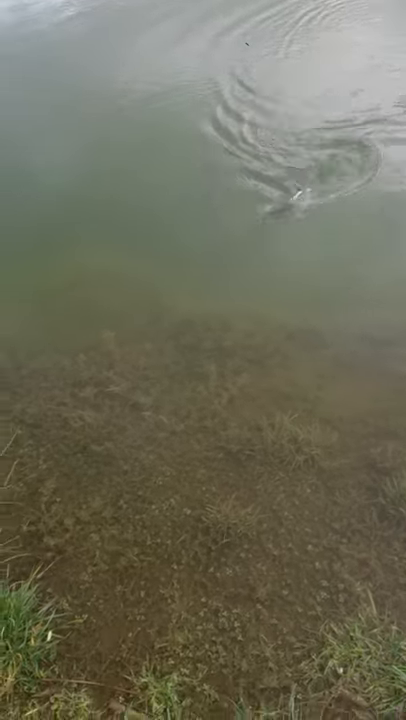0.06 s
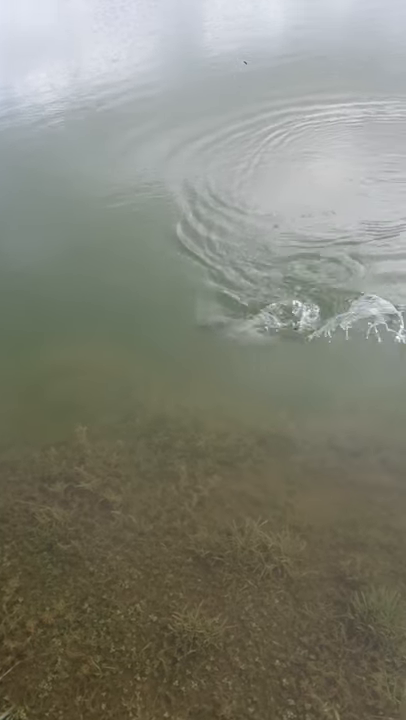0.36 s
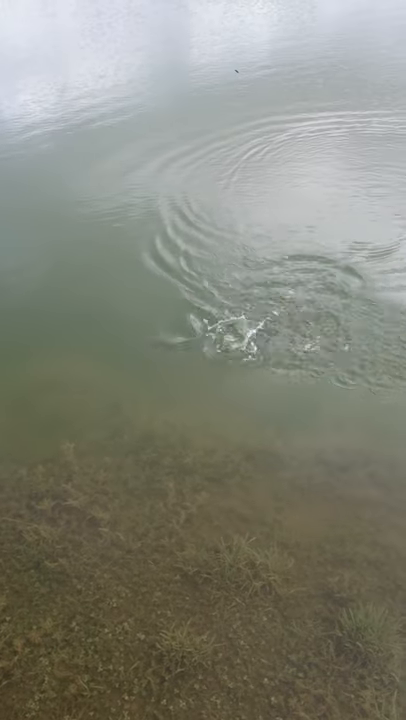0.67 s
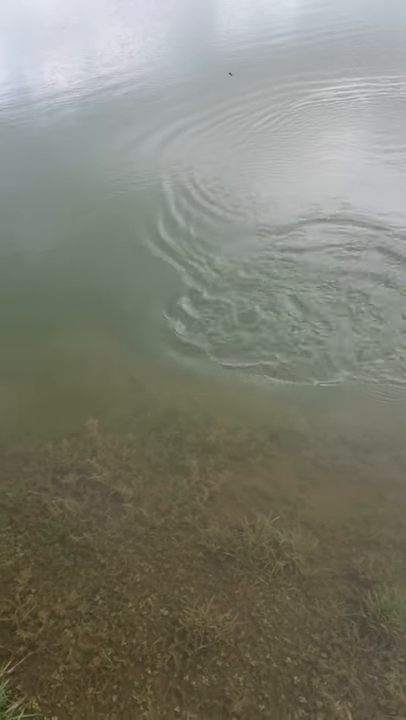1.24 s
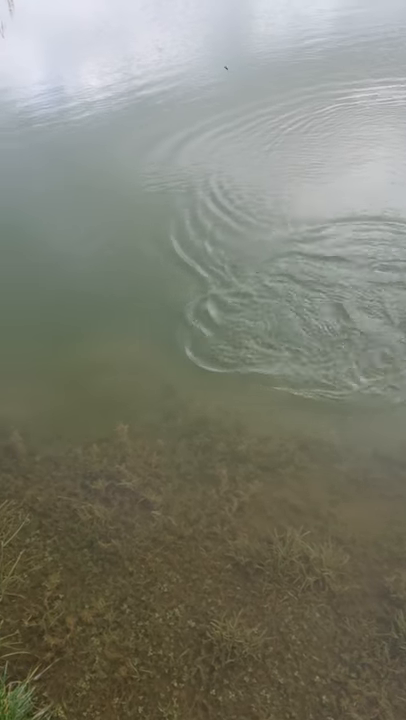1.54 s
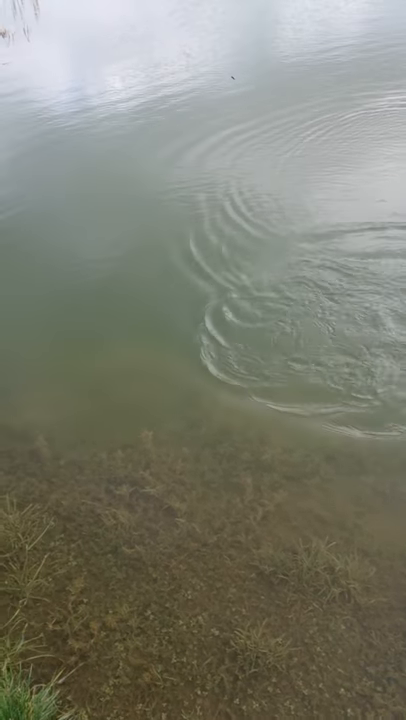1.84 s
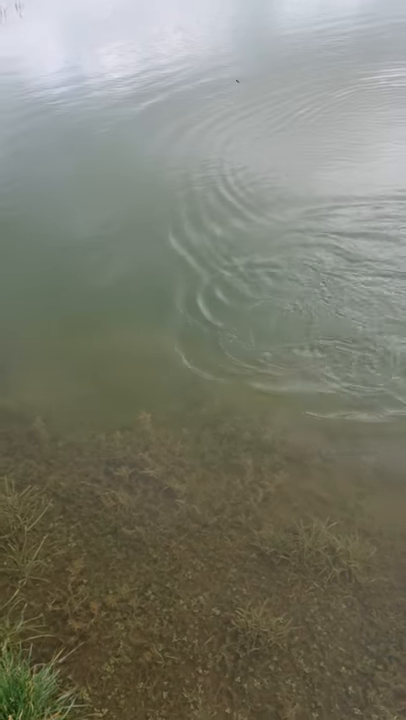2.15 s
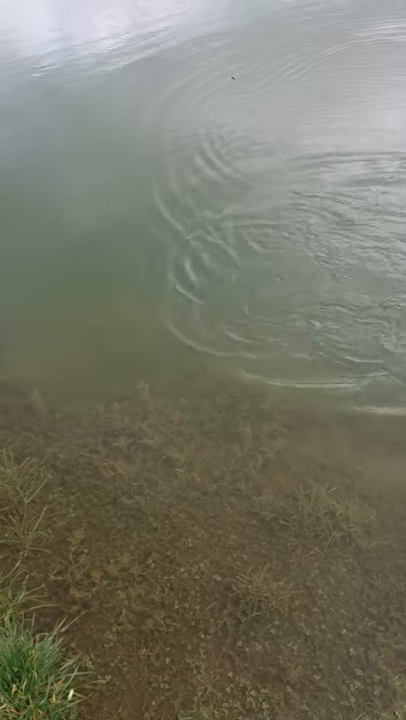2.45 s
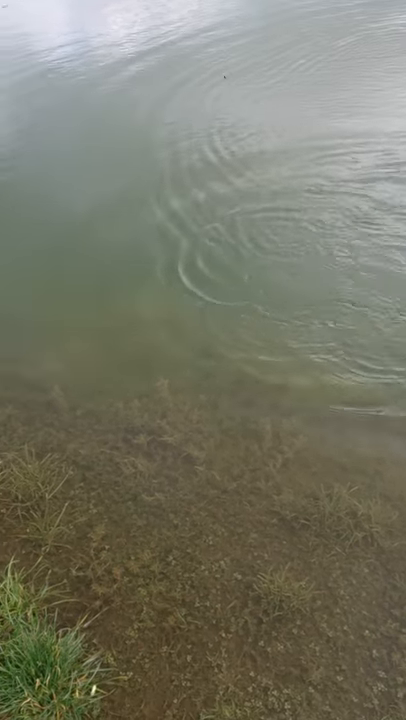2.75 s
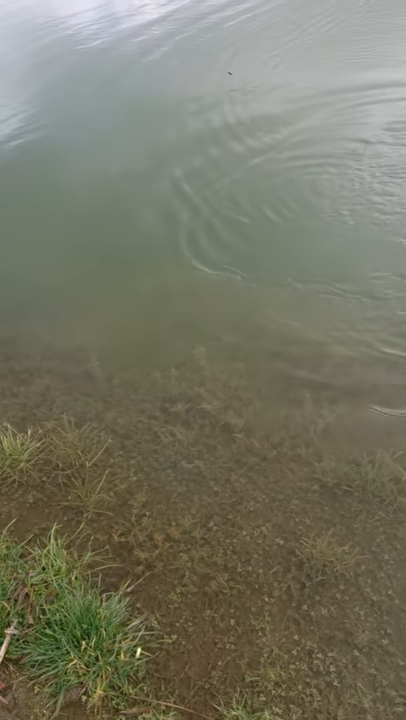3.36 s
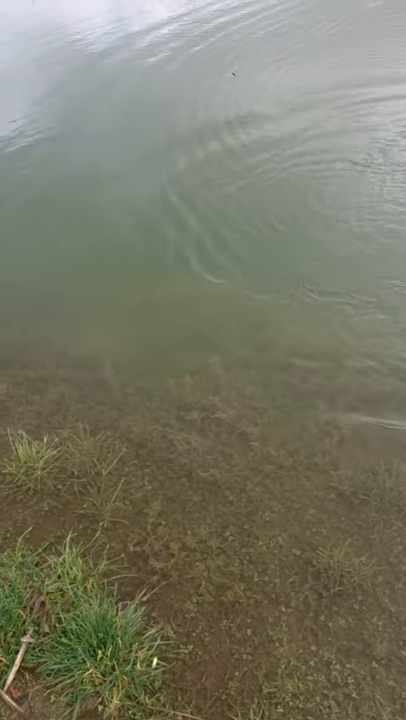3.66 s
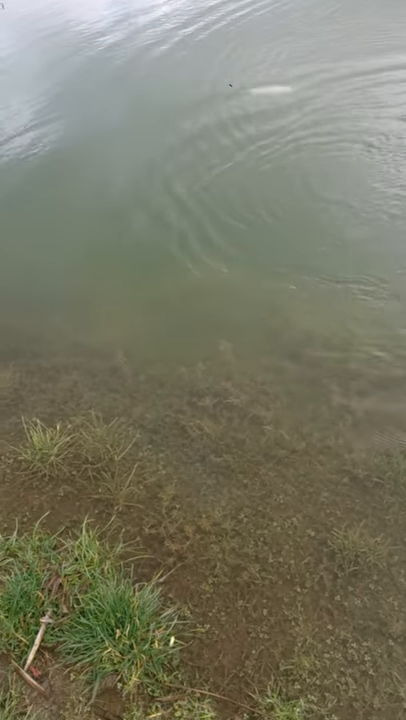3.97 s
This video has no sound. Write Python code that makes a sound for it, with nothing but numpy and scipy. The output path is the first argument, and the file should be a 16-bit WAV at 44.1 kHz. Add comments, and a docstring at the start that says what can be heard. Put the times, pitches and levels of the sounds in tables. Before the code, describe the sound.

A fish splashes briefly at a pond's surface while wind rumbles on the microphone.

```python
"""Fish thrashing in a pond

A few metres away a fish slaps the surface with its tail, air pockets ring as rising bubbles,
and spray patters back. Wind buffets the two microphone ports separately with rumble, eddies
and dull vortex knocks. Small birds call over a distant roar."""
import sys
import numpy as np
from scipy import signal
from scipy.fft import rfft, irfft
from scipy.io import wavfile

SR = 44100
rng = np.random.default_rng(int(sys.argv[2]) if len(sys.argv) > 2 else 0)


def persist_wave(psi):
    """Save psi, clipped to +-1, as 16-bit WAV."""
    counts = np.round(np.clip(psi, -1, 1) * 32767).astype(np.int16)
    wavfile.write(sys.argv[1], SR, np.atleast_2d(counts).T)


N = 176400

# spectrum of bubbling water (frequency [Hz], gain [dB])
CHURN_EQ = [(200, 9), (450, -5.5), (800, -0.5), (1250, 4), (1800, 4), (2500, 1.5), (3100, -1), (3800, -18),
            (4500, -18), (7000, -16), (16000, -51)]


def fish():
    """The whole splash, shaded at the right port, with short and long reflections."""
    left, right = at_ports(tail_slaps() + air_pockets()) + churn() + spray() + trickle()
    # shading of the right port (frequency [Hz], gain [dB])
    shade = [(200, 13), (1000, 1), (1800, 4.5), (2600, -4.5), (3200, -5), (3900, -6), (4500, -3),
             (5600, -4), (6600, -26), (7700, 1), (9000, -20), (11000, -10.5), (14500, -3)]
    near_bank = scatter(np.array([left, colour(right, shade)]), t60_s=0.027, wet_db=-9)
    return scatter(near_bank, t60_s=0.55, wet_db=-19)


def tail_slaps(decay_cycles=2.5, min_decay_s=0.0001, width_oct=0.73, size=1024):
    """Tail and big drops smack the water: broad bursts, the low ones dying more slowly."""
    # impacts (time [s], peak [dB], band centre [Hz])
    impacts = [(0.207, -54, 1820), (0.231, -53, 1170), (0.2425, -40, 3130), (0.301, -45, 6500),
               (0.326, -48, 2180), (0.337, -43, 4330), (.3645, -50, 3200), (.377, -45, 1700),
               (.43, -35.5, 1390), (.415, -37, 1750), (.4255, -30, 8200), (0.4353, -38, 9700),
               (0.4508, -32.5, 7000), (0.4565, -31.5, 6900), (.482, -40, 5900), (0.487, -34.5, 4330),
               (.577, -45, 9000), (0.6066, -34, 8100), (0.6303, -20.5, 5040), (0.6306, -20.5, 2800),
               (0.63, -37, 1340), (0.643, -35, 1520), (0.676, -35, 6400), (0.744, -36, 4500),
               (0.798, -39.5, 6300), (.841, -41.5, 7040), (0.879, -46, 9000), (0.895, -45, 6800),
               (.9225, -45, 8100), (1, -47, 8000), (1.045, -50.5, 5340), (1.37, -53, 8500),
               (1.941, -53.5, 8600)]
    out = np.zeros(N)
    t = np.arange(size) / SR
    for time_s, peak_db, hz in impacts:
        life_s = min_decay_s + decay_cycles / hz
        octaves = np.log2((np.fft.rfftfreq(size, 1 / SR) + 1) / hz)
        phase_rad = 2 * np.pi * rng.random(len(octaves))
        noise = irfft(np.exp(1j * phase_rad - (octaves / width_oct) ** 2))
        burst = noise * t / life_s * np.exp(-t / life_s)
        add(out, time_s, amp(peak_db) * burst / abs(burst).max())
    return out


def air_pockets():
    """Trapped air rings as single rising bubbles."""
    # pockets (time [s], gain [dB], start pitch [Hz], life [s])
    pockets = [(0.073, -48, 1123, 0.016), (0.228, -51, 1006, 0.013), (0.239, -24, 2350, 0.004),
               (0.268, -34, 856, 0.023), (0.323, -37, 1480, 0.01), (0.359, -41, 640, 0.017),
               (.367, -39.5, 783, 0.016), (0.375, -34, 1666, 0.0087), (0.415, -33, 1160, 0.0096),
               (0.431, -47, 1270, 0.015), (0.44, -36, 1697, 0.02), (.520, -36.5, 780, 0.0079),
               (0.522, -32, 1170, 0.0062), (0.63, -35, 1670, 0.0057), (0.642, -30.5, 1100, 0.0077),
               (0.645, -34.5, 1705, 0.013), (0.665, -59.5, 404, 0.039), (0.728, -47, 1000, 0.015),
               (0.755, -54, 406, 0.023), (0.82, -37.5, 1846, 0.02), (0.822, -59, 341, 0.066),
               (0.923, -53, 1230, 0.018), (0.959, -51, 2350, 0.014), (.975, -46.5, 1810, 0.01)]
    out = np.zeros(N)
    for time_s, gain_db, hz, life_s in pockets:
        add(out, time_s, amp(gain_db) * bubble(hz, life_s, rise=0.25, onset_s=0.0035))
    return out


def bubble(hz, life_s, rise, onset_s, wobble=0.05, wobble_s=0.002):
    """A ringing air pocket whose pitch wobbles and climbs as it nears the surface."""
    t = np.arange(0, 3 * life_s, 1 / SR)
    age = t / life_s
    jostle = wobble * np.interp(t / wobble_s, np.arange(80), rng.standard_normal(80))
    turns = np.cumsum(hz * (1 + jostle + rise * np.minimum(age, 2))) / SR
    attack = 1 - np.exp(-(t / onset_s) ** 2)
    return np.sin(2 * np.pi * turns) * attack * np.exp(-age - age ** 2)


def churn():
    """Churned water: a dense cloud of bubbles."""
    # envelope (time [s], level [dB])
    envelope = [(.19, -100), (.235, -48), (.30, -63.5), (.36, -46), (.395, -63), (.43, -44.5), (.47, -63),
                (.54, -49.5), (.61, -77), (.642, -48), (.67, -64), (.84, -67), (1.08, -87), (1.3, -84)]
    cloud = shower(per_s=2600, band_hz=(384.6, 5980), cycles=7.2,
                   spread_db=6.5, rise=0.19, onset_cycles=0.7)
    return level(envelope) * unit(colour(cloud, CHURN_EQ))


def spray():
    """Falling spray: drops patter back as tiny, high bubbles."""
    # envelope (time [s], level [dB])
    envelope = [(.19, -77.5), (.25, -60), (.31, -77.5), (.37, -54), (.40, -56.5), (.44, -49), (.472, -54.5),
                (.49, -46), (.53, -51.5), (.60, -55), (.72, -58.5), (.87, -61.5), (1.02, -68.5),
                (1.1, -72.5), (1.6, -78.5), (2.1, -106)]
    # spectrum (frequency [Hz], gain [dB])
    eq = [(500, -40), (2000, -8), (3100, 1), (3900, 0.5), (5000, 1.5), (7000, -1), (8700, 6), (11000, -3),
          (12600, -16), (14500, -8), (16000, -23)]
    drops = shower(per_s=3500, band_hz=(2100, 14700), cycles=4.8,
                   spread_db=2.5, rise=0.016, onset_cycles=0.99)
    return level(envelope) * unit(colour(drops, eq))


def trickle():
    """Small bubbles trickle up as the water settles."""
    # envelope (time [s], level [dB])
    envelope = [(.3, -80), (.42, -56), (.72, -61), (.85, -65), (1, -85), (1.2, -101)]
    bubbles = shower(per_s=260, band_hz=(600, 5500), cycles=11, spread_db=4, rise=0.1, onset_cycles=1)
    return level(envelope) * unit(colour(bubbles, CHURN_EQ))


def shower(per_s, band_hz, cycles, spread_db, rise, onset_cycles, sizes=44, clump_s=0.014, clump_db=3.5):
    """Tiny bubbles of many sizes at random times, swelling as the water falls in clumps."""
    out = np.zeros((2, N))
    clump_index = np.arange(N) / SR / clump_s
    for group_hz in np.array_split(np.geomspace(*band_hz, sizes), 4):
        clumps = amp(clump_db * np.interp(clump_index, np.arange(2048), rng.standard_normal(2048)))
        for hz in group_hz:
            births = rng.random(N) < per_s / sizes / SR
            hits = births * clumps * amp(spread_db * np.minimum(rng.exponential(1, N), 3))
            grain = np.pad(bubble(hz, cycles / hz, rise, onset_cycles / hz), 32)
            offset_s = 0.00005 * rng.standard_normal()  # drops land all around the fish
            out += signal.oaconvolve(hits[None], at_ports(grain * hz, offset_s), axes=1)[:, :N]
    return out


def wind_rumble():
    """Wind pressure swells and sinks separately on each port."""
    # gusts on the left port (time [s], level [dB])
    left = [(0, -35), (.22, -35), (.72, -40), (1.02, -29), (1.3, -32), (1.56, -53), (1.95, -34),
            (2.38, -30), (2.55, -39), (2.97, -26), (3.3, -38.5), (3.55, -28.5), (3.75, -31.5), (4, -36)]
    # gusts on the right port (time [s], level [dB])
    right = [(0, -31), (.17, -31.5), (.37, -42), (.78, -46.5), (1.05, -31.5), (1.24, -21.5), (1.33, -32.5),
             (1.43, -43.5), (1.72, -33.5), (2.022, -22.5), (2.18, -36), (2.5, -29.5), (2.86, -19.5),
             (3.08, -27), (3.219, -19.5), (3.46, -26), (3.609, -16), (3.78, -31), (4, -36.5)]
    # spectrum (frequency [Hz], gain [dB])
    eq = [(5, 7), (20, -1.5), (45, -5), (90, -16.5), (160, -26), (300, -40), (600, -60.5), (2000, -104)]
    return np.array([level(gusts) * unit(colour(rng.standard_normal(N), eq)) for gusts in (left, right)])


def wind_eddies(oct_per_db=0.12, typical_db=-34, right_scale=0.69, size=16384):
    """Eddies flutter over a port; stronger ones reach higher, those on the right sound lower."""
    # eddies (centre time [s], length [s], level [dB], port [0 left, 1 right])
    eddies = [(.051, 0.033, -35.5, 0), (0.161, 0.13, -38, 0), (.37, 0.054, -36.5, 0), (.52, 0.12, -42, 0),
              (0.699, 0.0044, -35.5, 0), (.903, 0.022, -34.5, 0), (1.04, 0.083, -35.5, 0),
              (1.18, 0.031, -39.5, 0), (1.242, 0.052, -36, 1), (2.017, 0.017, -35, 1),
              (2.041, 0.088, -39, 0), (2.31, 0.035, -33, 0), (2.4, 0.052, -34.5, 0),
              (2.505, 0.042, -34.5, 0), (2.53, 0.17, -37.5, 1), (2.679, 0.046, -32.5, 1),
              (2.85, 0.066, -32.5, 1), (3.0, 0.048, -33.5, 0), (3.1, 0.089, -36.5, 0),
              (3.219, 0.029, -31.5, 1), (3.391, 0.017, -32, 1), (3.53, 0.027, -30, 0),
              (3.609, 0.037, -29, 1), (3.629, 0.069, -36.5, 0), (3.67, 0.035, -29, 1),
              (3.869, 0.13, -33.5, 1)]
    # spectrum before pitch scaling (frequency [Hz], gain [dB])
    eq = [(10, -45), (50, -10), (110, 4.5), (200, -6.5), (310, -13.5), (450, -24.5), (800, -42),
          (2000, -82), (6000, -76)]
    out = np.zeros((2, N))
    t = (np.arange(size) - size / 2) / SR
    for time_s, length_s, level_db, port in eddies:
        swell = np.exp(-2.2 * (t / length_s) ** 2)
        pitch_scale = 2 ** (oct_per_db * (level_db - typical_db)) * (right_scale if port else 1)
        eddy = swell * colour(rng.standard_normal(size), eq, pitch_scale)
        gain = amp(level_db) * np.linalg.norm(swell) / np.linalg.norm(eddy)
        add(out[port], time_s + t[0], gain * eddy)
    return out


def vortex_knocks(steepness=1.593, size=4096):
    """A vortex crossing a port: one brief dip in pressure, heard as a dull knock."""
    # vortices (time [s], peak [dB], roll-off [Hz], port [0 left, 1 right])
    vortices = [(0.209, -21, 173, 0), (0.991, -23.5, 153, 0), (1.009, -25, 170, 0), (1.051, -24, 244, 0),
                (1.1, -27.5, 162, 0), (1.174, -25, 197, 0), (1.193, -25.5, 173, 1), (1.855, -16.5, 102, 1),
                (2.025, -22.5, 60.3, 1), (2.08, -25, 159, 0), (2.288, -23.5, 173, 0),
                (2.301, -26.5, 214, 0), (2.381, -24, 172, 0), (2.424, -26, 213, 0), (2.5, -27.5, 186, 0),
                (2.674, -21, 215, 0), (2.694, -19.5, 176, 0), (2.774, -24.5, 126, 1),
                (2.829, -23.5, 127, 1), (2.859, -28, 192, 1), (2.98, -22, 152, 0), (3.093, -27.5, 140, 1),
                (3.211, -25.5, 184, 1), (3.378, -19, 135, 1), (3.52, -15, 232, 0), (3.603, -17.5, 128, 1),
                (3.676, -28, 220, 1), (3.853, -25.5, 162, 0)]
    out = np.zeros((2, N))
    for time_s, peak_db, hz, port in vortices:
        ratio = np.fft.rfftfreq(size, 1 / SR) / hz
        dip = np.fft.fftshift(irfft(ratio * np.exp(-ratio ** steepness)))
        add(out[port], time_s - size / 2 / SR, -amp(peak_db) * dip / dip.max())
    return out


def birds(warble_hz=48):
    """Far whistles and thin zigzag chirps, blurred by the surroundings."""
    # notes (time [s], length [s], level [dB], start pitch [Hz], middle pitch [Hz], end pitch [Hz],
    # left minus right [dB], warble depth [share of pitch])
    notes = [(-.005, 0.047, -60.5, 1900, 1994, 1660, -11, 0),
             (1.435, .13, -77, 2410, 2565, 2450, -5, 0.007),
             (1.677, 0.0093, -67.5, 8600, 7200, 5600, -15, 0.017),
             (1.722, 0.035, -78, 6040, 5470, 5000, -8, .05),
             (1.758, 0.097, -73, 4700, 4540, 3970, -14, .09),
             (1.783, 0.16, -74.5, 2154, 2020, 2050, -13, 0.019),
             (2.233, 0.075, -83, 4550, 5230, 6550, 0, 0), (2.392, 0.039, -67.5, 4450, 4810, 4230, 1, 0.021),
             (2.508, 0.054, -73.5, 4250, 4460, 4300, -7, .07),
             (2.624, 0.041, -71.5, 3810, 4220, 3950, -5, 0.046),
             (2.733, 0.043, -69.5, 4130, 4440, 3670, -7, 0.027),
             (2.728, .045, -76, 2180, 2300, 2200, -14, 0.0049),
             (2.842, 0.067, -75, 5500, 5970, 6070, -6, 0.084),
             (2.962, .052, -77.5, 7800, 6680, 7800, -3, .02)]
    out = np.zeros((2, N))
    for time_s, length_s, level_db, *pitches_hz, pan_db, warble in notes:
        t = np.arange(0, length_s, 1 / SR)
        glide_hz = np.polyval(np.polyfit([0, 0.5, 1], pitches_hz, 2), t / length_s)
        hz = glide_hz * (1 + warble * np.sin(2 * np.pi * (warble_hz * t + rng.random())))
        note = np.sin(np.pi * t / length_s) * np.sin(2 * np.pi * np.cumsum(hz) / SR)
        add(out, time_s, amp([[level_db + pan_db / 2], [level_db - pan_db / 2]]) * note)
    return scatter(out, t60_s=0.3, wet_db=-5)


def distant_roar(right_lead_rad=1.12):
    """A nearly steady far roar from the right, with a faint hiss."""
    # spectrum (frequency [Hz], gain [dB])
    eq = [(30, 13.5), (200, 5), (400, -4.5), (650, 4), (950, 8.5), (1300, -4.5), (2000, -13.5),
          (3000, -17.5), (6000, -21), (8300, -21), (11000, -24), (13000, -28), (16000, -52)]
    # balance (frequency [Hz], left minus right [dB])
    balance = [(200, 4.5), (900, -6), (2000, -8), (5000, -3), (7600, -7.5), (9000, 2), (12000, 0)]
    # likeness of the ports (frequency [Hz], correlation [0-1])
    likeness = [(100, 1), (900, 0.79), (1500, 1), (2300, 0.12), (6000, 0.089)]
    # envelope (time [s], level [dB])
    envelope = [(0, -58.5), (1.5, -58.5), (2.1, -56.5), (3, -58.5), (4, -58.5)]
    hz = np.fft.rfftfreq(N, 1 / SR)
    left, independent = rfft(rng.standard_normal((2, N)))
    shared = read(likeness, hz)
    right = shared * left + np.sqrt(1 - shared ** 2) * independent
    right *= np.exp(1j * right_lead_rad * np.minimum(hz / 800, 1))
    tilt_db = read(balance, hz) / 2
    spectra = np.array([left * amp(tilt_db), right * amp(-tilt_db)]) * amp(read(eq, hz))
    return level(envelope) * unit(irfft(spectra, N))


def at_ports(x, offset_s=0):
    """A splash reaches the left port first, the right a moment later."""
    # lag of the right port (frequency [Hz], delay [s])
    lag = [(1000, 0.00021), (2400, 0.00023), (3950, 0.00014), (4400, 0.00014), (6000, 0.00043),
           (7000, 0.00031), (9000, 0.000248)]
    hz = np.fft.rfftfreq(len(x), 1 / SR)
    delay_s = read(lag, hz) + offset_s
    right = irfft(rfft(x) * np.exp(-2j * np.pi * hz * delay_s), len(x))
    return np.array([x, right])


def scatter(x, t60_s, wet_db):
    """Adds a diffuse tail, different at each port."""
    t = np.arange(SR // 2) / SR
    tail = rng.standard_normal((2, len(t))) * amp(-60 * t / t60_s) * (1 - np.exp(-t * 2000))
    tail /= np.linalg.norm(tail, axis=1, keepdims=True)
    return x + amp(wet_db) * signal.fftconvolve(x, tail, axes=1)[:, :N]


def amp(db):
    """Decibels to gain."""
    return 10 ** (np.asarray(db) / 20)


def unit(x):
    """Scales to unit rms."""
    return x / np.sqrt(np.mean(x ** 2) + 1e-20)


def read(points, hz):
    """Interpolates a table on a log-frequency axis."""
    table_hz, values = np.transpose(points)
    return np.interp(np.log(hz + 1), np.log(table_hz + 1), values)


def level(points):
    """A (time [s], level [dB]) curve as gain per sample."""
    return amp(np.interp(np.arange(N) / SR, *np.transpose(points)))


def colour(x, points, pitch_scale=1):
    """Filters by a (frequency [Hz], gain [dB]) table, optionally moved in pitch."""
    size = x.shape[-1]
    hz = np.fft.rfftfreq(size, 1 / SR)
    return irfft(rfft(x) * amp(read(points, hz / pitch_scale)), size)


def add(mix, time_s, sound):
    """Mixes a sound in place, trimmed to fit."""
    start = round(time_s * SR)
    sound = sound[..., max(-start, 0):]
    part = mix[..., max(start, 0):][..., :sound.shape[-1]]
    part += sound[..., :part.shape[-1]]


def scene():
    """The pond from the bank."""
    return fish() + wind_rumble() + wind_eddies() + vortex_knocks() + distant_roar() + birds()


def record(dry, cutoff_hz=15800):
    """The recorder's band limit."""
    lowpass = signal.firwin(511, cutoff_hz, window=("kaiser", 9), fs=SR)
    padded = np.pad(dry, [(0, 0), (255, 255)], mode="edge")
    return signal.oaconvolve(padded, lowpass[None], "valid")


dry = scene()
out = record(dry)
persist_wave(out)
```